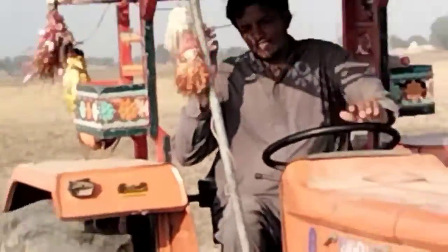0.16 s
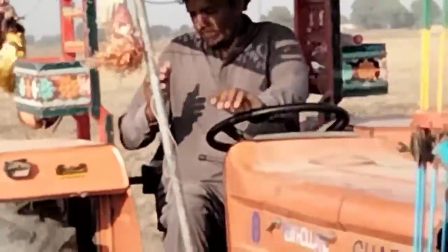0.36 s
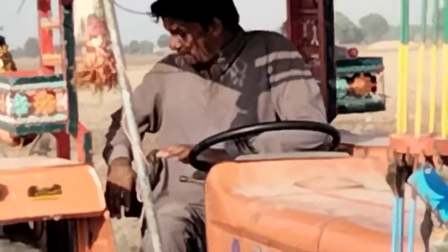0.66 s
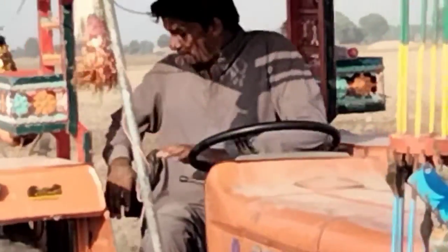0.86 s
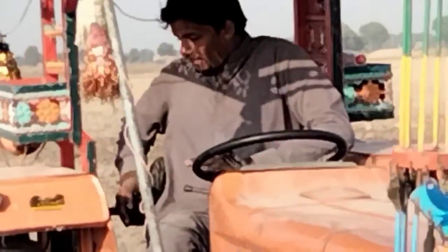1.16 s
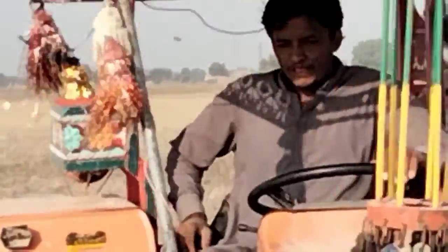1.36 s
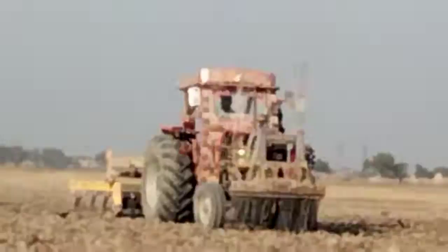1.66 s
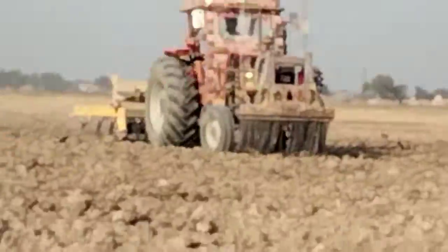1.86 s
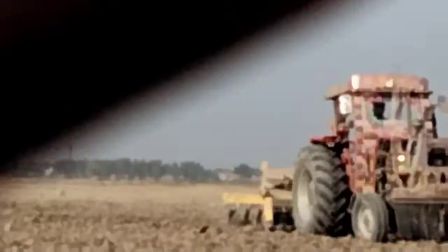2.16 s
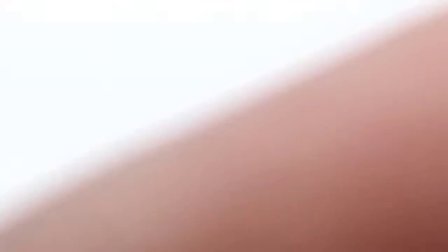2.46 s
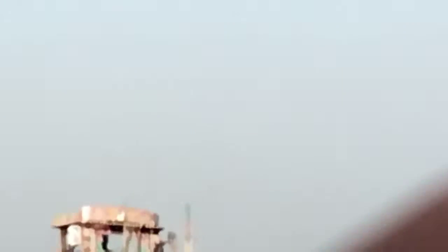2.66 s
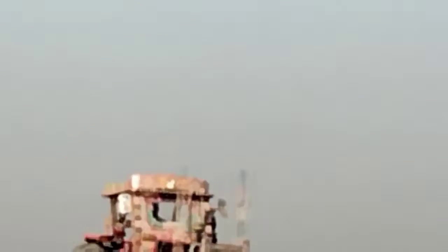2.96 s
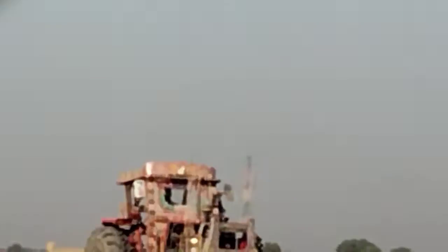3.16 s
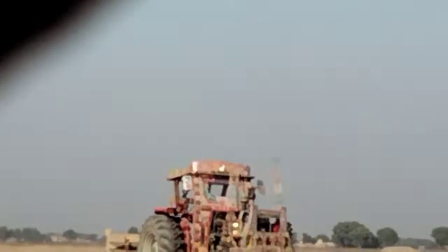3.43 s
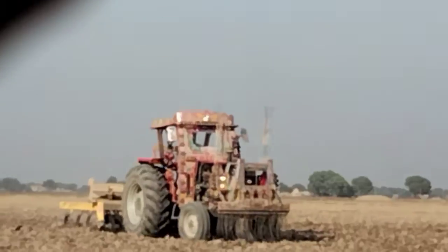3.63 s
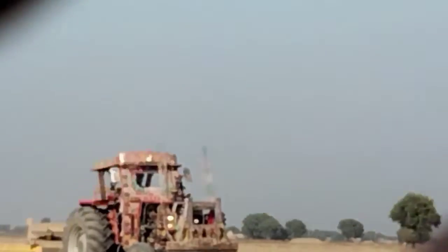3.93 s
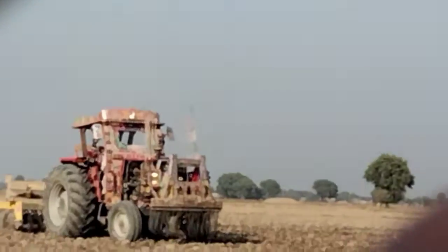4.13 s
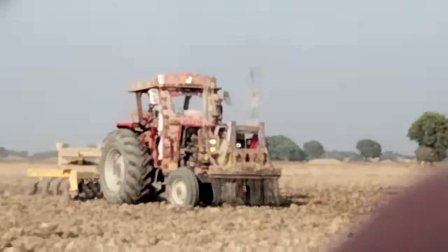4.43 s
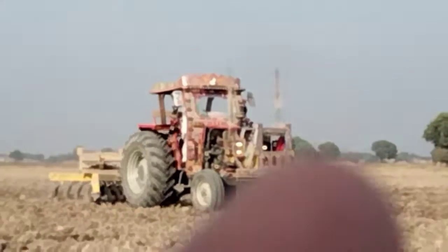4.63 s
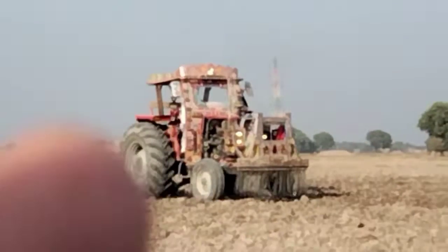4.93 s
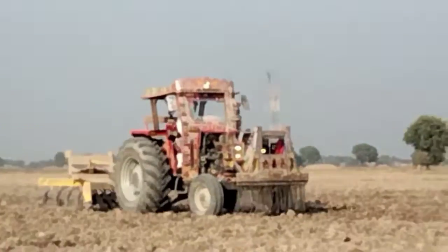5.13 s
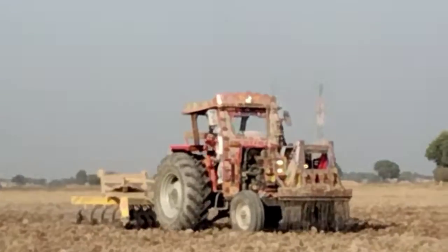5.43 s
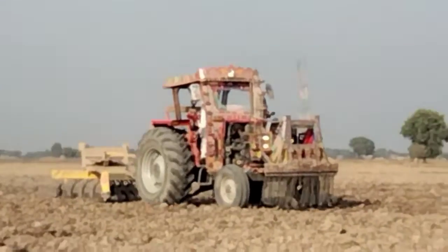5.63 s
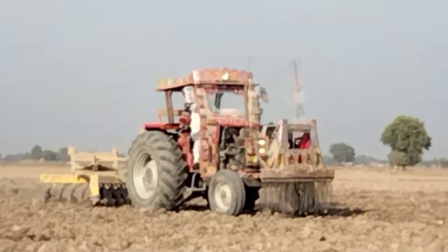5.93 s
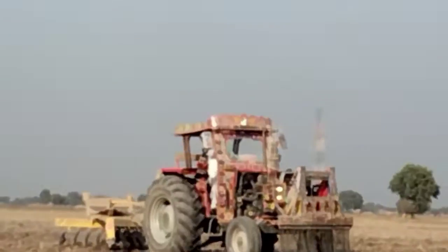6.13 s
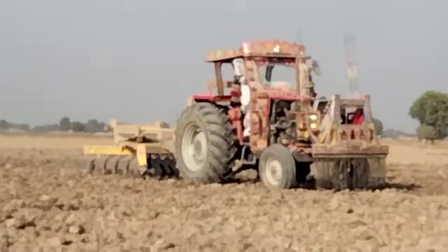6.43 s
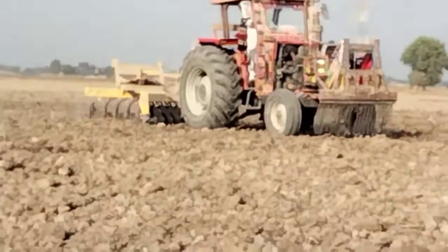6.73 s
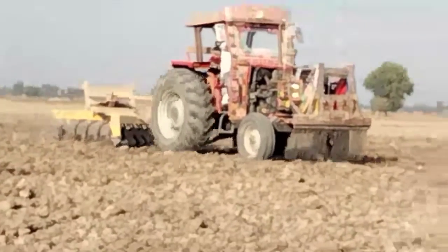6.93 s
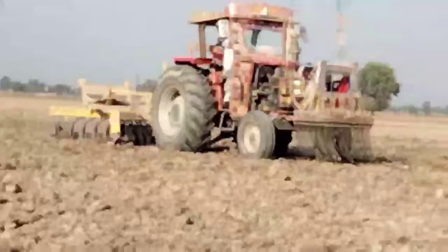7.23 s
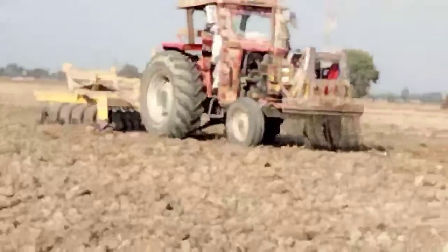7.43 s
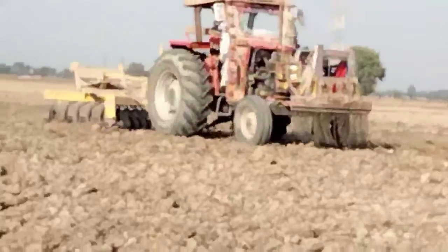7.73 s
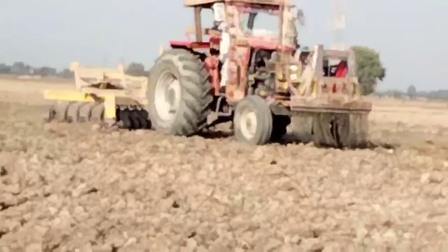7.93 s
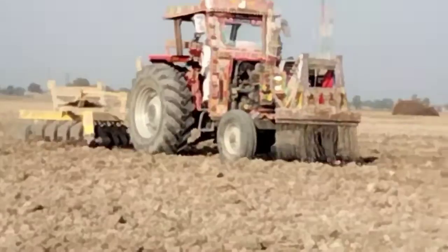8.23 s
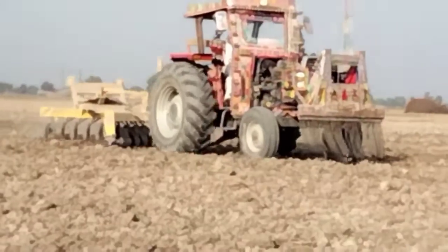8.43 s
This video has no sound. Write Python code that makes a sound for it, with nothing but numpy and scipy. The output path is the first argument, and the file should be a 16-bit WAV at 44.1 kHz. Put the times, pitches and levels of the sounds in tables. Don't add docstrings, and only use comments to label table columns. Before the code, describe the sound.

Outdoors on dry farmland, a phone picks up a three-cylinder diesel tractor very close: fast chugging exhaust, hard piston knocks, loose metal and brief chain shakes, growing louder over a faint second engine. After about two and a half seconds it cuts to two distant tractors, softer, their notes beating over hissing disc harrows, with small bells, stone ticks and gear whine. A hand on the microphone dulls the treble.

```python
import sys
import numpy as np
from scipy import signal
from scipy.fft import rfft, irfft
from scipy.io import wavfile
from scipy.ndimage import uniform_filter1d, map_coordinates

SR = 44100
rng = np.random.default_rng(int(sys.argv[2]) if len(sys.argv) > 2 else 0)


def dump(signal):
    limited = np.clip(np.atleast_2d(signal).T, -1, 1)
    pcm = np.round(limited * 32767).astype(np.int16)
    wavfile.write(sys.argv[1], SR, pcm)


def level_to_linear(level):
    exponent = np.asarray(level, float) / 20
    return 10 ** exponent


N = 378378
T = np.arange(N) / SR
CUT_S = 2.43

# t/s, firing f/Hz
CLOSE_ENGINE = [
    (0.0, 46.4),
    (0.89, 46.92),
    (1.26, 46.15),
    (2.01, 46.84),
    (2.43, 45.33),
]
# t/s, firing f/Hz, level/dB
BEHIND_ENGINE = [(0, 37.7, -51), (.4, 40.4, -40), (.8, 40.4, -44), (1.2, 39.7, -39), (1.6, 41.8, -41),
                 (2.0, 38.4, -36), (2.43, 40, -46)]
# t/s, firing f/Hz
FAR_FOUR = [(2.43, 43.51), (3.21, 45.04), (3.34, 43.6), (3.77, 45.1), (3.94, 46.13), (4.16, 43.57),
            (4.6, 45.51), (5.0, 42.98), (5.49, 45.9), (5.96, 43.15), (6.13, 44.85), (6.78, 43.94),
            (7.13, 43.84), (7.6, 45.18), (7.75, 44.03), (7.89, 44.79), (8.58, 44.21)]
FAR_THREE = [(2.43, 47.41), (3.2, 46.4), (4.09, 48.02), (5.06, 47.22), (5.34, 47.83), (5.86, 47.76),
             (7.23, 45.81), (7.78, 46.01), (8.58, 44.59)]
# multiple of the firing rate, level over the note/dB
CLOSE_ORDERS = [(1, 0.5), (2, 0.5), (3, -0.5), (4, -3.5), (5, -11.5), (6, -5), (7, -51), (8, -34),
                (9, -9.5)]
FOUR_ORDERS = [(1, 4.5), (2, -0.5), (2.999, -21), (1.25, -24), (2.5, -23), (2.75, -21)]
THREE_ORDERS = [(1, -6), (2, -0.5), (3, -28)]
# t/s, level/dB
APPROACH = [
    (0, 0),
    (.86, 1.4),
    (1.46, 4.5),
    (2.0, 4),
    (2.24, 5.5),
    (2.43, 2),
]
# distant level/dB, share of the nearness
CLOSE_LAYERS = [
    (-31, 0.77),
    (-30.5, 0.98),
    (-33.5, 0.49),
    (-40.5, 0.58),
]
# f/Hz, level/dB per Hz
CLOSE_COLOUR = [(35, -7), (60, -7.5), (142, -9), (210, -6), (423, -5.5), (497, -14.5), (792, -7),
                (1830, -14.5), (2360, -15.5), (4030, -20), (5200, -16), (7900, -20), (15500, -55.5)]
# f/Hz,
# width/Hz, level/dB
CLOSE_BODY = [(418, 26, -5.5), (774, 270, 1.5), (1290, 75, 5), (2260, 460, 3), (4000, 67, 1),
              (5130, 2500, 4), (7800, 280, 1.5)]
BONNET = [(10300, 4100, -8), (11940, 900, 7.5)]
CYLINDERS_DB = [2.5, -1, 1.5]
CYLINDERS_LATE = [.02, .08, .08]
# f/Hz, ring time/s, level/dB, hard cylinder extra/dB
BLOCK_MODES = [(900, .025, -11, 2), (1440, 0.025, -5, 1), (2350, 0.014, -6, -8), (2930, 0.0059, -8, 8),
               (3790, 0.018, 0.5, -4), (3160, 0.019, -4, 5.5), (6500, 0.018, -5.5, 2),
               (5095, 0.027, 2.5, 2), (5430, 0.025, -3, 3), (8070, 0.022, -3, 2), (11100, .005, -1.5, 13)]
FAR_MODES = [(1334, 0.045, -5.5, 0), (1433, 0.094, -2, 0), (1582, 0.071, -0.5, 0), (1699, .06, -2.5, -2),
             (2100, 0.052, -4, 2), (2300, 0.05, -4, 1), (2487, 0.1, 0, -2), (2708, 0.075, -2.5, -3),
             (3790, 0.027, -10.5, 2), (5100, 0.018, -14, 0), (6940, .03, -8, 0)]
# t/s, level/dB, f/Hz
SLAPS = [(0.1785, -23, 2370), (0.3087, -17, 2350), (0.3712, -24, 3170), (0.4369, -16, 2320),
         (0.5646, -38, 1960), (0.629, -17, 2110), (0.6928, -17, 2170), (0.757, -16, 2420),
         (0.8425, -16, 2300), (0.8859, -14, 2310), (0.9497, -21, 2350), (1.0141, -22, 2300),
         (1.078, -19, 2300), (1.1428, -22, 2330), (1.2072, -18, 1980), (1.2725, -13, 2420),
         (1.3154, -14, 2200), (1.3372, -9.5, 2370), (1.402, -12, 2070), (1.4446, -21, 2860),
         (1.4666, -17, 2050), (1.5314, -13, 2380), (1.579, -17, 2510), (1.5968, -14, 2460),
         (1.6602, -12, 2020), (1.725, -12, 2160), (1.7464, -21, 2330), (1.8123, -20, 2430),
         (1.8533, -6.5, 2340), (1.8966, -22, 2540), (1.918, -14, 2330), (1.9817, -11, 2320),
         (2.0053, -24, 2290), (2.0455, -18, 2390), (2.1101, -11, 2240), (2.1745, -18, 2200),
         (2.2403, -17, 2260), (2.3052, -10.5, 2180), (2.371, -11.5, 2420), (2.4154, -16, 2260)]
PLATE_SLAPS = [(0.0712, -22, 3820), (0.179, -27, 3700), (0.7567, -25, 3890), (1.3154, -19, 3780),
               (1.4446, -21, 3730), (1.5743, -21, 3830), (1.6606, -23, 3360), (1.725, -26, 3740),
               (1.8327, -27, 3710), (1.94, -24, 3600), (2.175, -19, 3530), (2.2633, -24, 3560),
               (2.3052, -22, 3650), (2.3286, -14, 3650)]
PUMP_SLAPS = [(0.0498, -21, 5020), (0.1136, -22, 5170), (0.2668, -23, 5050), (0.3726, -16, 5000),
              (0.5651, -21, 5200), (0.6938, -18, 5030), (0.7587, -20, 5000), (0.8849, -22, 4970),
              (0.9492, -21, 4980), (1.0585, -21, 4900), (1.0789, -14, 5300), (1.1438, -22, 5200),
              (1.273, -17, 5080), (1.295, -19, 5110), (1.3174, -21, 5230), (1.3379, -22, 5150),
              (1.4022, -17, 5700), (1.6856, -17, 5270), (1.7684, -16, 5100), (1.7903, -20, 5000),
              (1.918, -22, 5210), (2.1106, -20, 5270)]
# t/s, length/s, level/dB, ringing link f/Hz, ring share
CHAIN = [
    (1.569, 0.045, -22, 6000, 0.73),
    (1.833, 0.029, -29, 5900, .6),
    (2.007, 0.061, -21.5, 5870, 0.61),
    (2.2, 0.074, -22.5, 7600, 0.33),
    (2.28, 0.16, -25.5, 7340, 0.37),
]
# from t/s, to t/s, f/Hz, width/Hz, level/dB
CLOSE_HOLLOWS = [(-.2, .5, 920, 199, 4), (-.2, .7, 2750, 300, -1), (-.2, 1.3, 4260, 400, -0.5),
                 (.4, 1.3, 820, 200, 2), (2.0, 2.6, 7440, 1500, 0.5), (2.0, 2.6, 11200, 2000, -1),
                 (2.0, 2.6, 2500, 800, 2), (1.1, 1.4, 400, 119, -4.5)]
FAR_HOLLOWS = [(2.202, 2.9, 5070, 900, 4.5), (2.202, 2.9, 6240, 500, -3), (2.2, 2.9, 8050, 2000, 2.5),
               (2.2, 2.9, 13500, 3000, -3), (2.2, 2.9, 2500, 300, 0), (2.2, 2.9, 2100, 300, -3.5),
               (4.102, 4.7, 2870, 350, 3), (7.24, 7.358, 2350, 500, 4), (7.6, 7.7, 2400, 500, 4),
               (5.2, 6.402, 4130, 600, 3.5), (5.8, 6.6, 3470, 300, -3), (5.2, 5.8, 4580, 300, -5),
               (5.8, 6.4, 7260, 600, 5.5), (5.8, 6.4, 1330, 200, 3), (5.8, 6.5, 10450, 400, 0),
               (4.7, 5.803, 14000, 2000, 4.5), (6.5, 7.3, 9800, 500, -4), (6.9, 7.3, 6500, 700, -2),
               (6.9, 7.3, 5600, 400, 1), (7.2, 7.75, 2350, 400, 0), (7.3, 7.7, 7800, 600, 0),
               (7.75, 8.8, 5000, 250, -9), (7.75, 8.8, 7400, 300, -6), (7.7, 8.8, 9950, 300, 1)]
# t/s, level/dB, cover 0-1
FIELD = [(2.44, -41, 0.04), (2.82, -41, 0.3), (2.95, -37.5, 0.21), (3.26, -35.5, 0.28), (3.6, -36, 0.62),
         (3.9, -39, 1.1), (4.3, -39, 0.94), (4.66, -36.5, 0.63), (4.72, -35, 0.42), (5.04, -35, 0.17),
         (5.43, -35.5, 0.2), (6.0, -39.5, .01), (6.3, -38.5, 0.04), (6.5, -40, 0.05), (6.89, -40.5, 0.02),
         (7.3, -39.5, 0.13), (7.62, -39, 0.12), (8.58, -38.5, 0.12)]
# f/Hz, level/dB per Hz
OPEN_COLOUR = [(290, -58), (500, -14), (726, -7), (803, -8), (927, -9.5), (1060, -8.5), (1620, 1),
               (2760, -1.5), (3190, -7), (5510, -17), (7030, -16.5), (11500, -17), (15500, -15.5)]
CUPPED_COLOUR = [(290, -38), (500, -19), (769, -8.5), (839, -7), (1090, -13), (1390, -6.5), (1960, -5.5),
                 (2460, -9.5), (6180, -18), (8360, -18), (15500, -24)]
SHADED_COLOUR = [(290, -51), (500, -17.5), (888, -9), (997, -15), (1370, -7), (1850, -6.5), (2010, -1.5),
                 (2500, -4.5), (3190, -13.5), (8360, -19.5), (15500, -29.5)]
# f/Hz, width/Hz, level/dB
OPEN_BODY = [(829, 68, 7.5), (1244, 270, 4.5), (2480, 140, 3), (1050, 71, 5.5), (4450, 1000, 1.5)]
CUPPED_BODY = [(1340, 110, 9), (1850, 260, -4.5), (2460, 250, 9), (6460, 640, 0), (9100, 500, 4),
               (10700, 360, 7), (11600, 1500, -9)]
SHADED_BODY = [(1366, 88, 8.5), (1850, 180, -7), (2300, 430, 2), (5560, 300, 1.5), (6250, 270, 3),
               (7340, 630, -3), (9400, 300, 4), (10000, 310, -3), (10450, 450, 2.5), (8340, 500, 4.5),
               (12000, 1300, -10), (14300, 900, 10)]
# level under it/dB, loss to full cover/dB, loss to cupping/dB, delay of the hand/s
PORT = [
    (-9.5, -3, -7, .01),
    (-9.5, -7.5, -4.5, .01),
    (-29, -31, -4, .17),
    (-14.5, -38, -3, 0.55),
]
# f/Hz, level/dB per Hz
SOIL = [(18, 0), (40, 3), (110, 3.5), (150, -1.5), (220, -11.5), (350, -5), (480, -11.5), (620, -7.5),
        (800, -42.5)]
# t/s, f/Hz
GEAR = [(5.0, 773.2), (5.22, 836.2), (5.32, 811.8), (5.6, 866.6), (5.97, 829.8), (6.03, 852.7),
        (8.29, 854.1), (8.3, 826.8), (8.58, 861.6)]
# multiple of the mesh, level/dB
GEAR_LINES = [(1, -7), (.815, -14), (.455, -16)]
# t/s, f/Hz, level/dB, length/s
BELLS = [(4.87, 14350, -62, .025), (4.953, 13200, -56, .025), (4.955, 12400, -58, .03),
         (4.955, 15300, -58, .03), (4.997, 12630, -51, .07), (4.997, 15340, -51, .06),
         (4.997, 14770, -59, .07), (4.997, 10510, -53, 0.087), (5.01, 9490, -57, .05),
         (5.3, 13000, -62, .03), (5.35, 9500, -50, .06), (5.358, 10300, -47, .05), (5.587, 14900, -54, .04),
         (5.8, 9500, -61, .025), (5.95, 12050, -57, .02), (6.27, 14900, -57, 0.037),
         (6.27, 12300, -58, .025), (6.42, 8650, -51, 0.049), (6.56, 8750, -48, 0.026),
         (7.31, 8650, -53, .03), (7.412, 7800, -48, .015), (6.02, 14700, -62, .04),
         (7.22, 8250, -44, 0.029), (7.435, 11800, -64, .035), (7.222, 10400, -58, .03),
         (7.228, 12800, -66, .02), (7.23, 14900, -64, .02), (7.256, 7600, -52, .015),
         (7.395, 9500, -58, .03), (5.967, 8080, -43, .015)]
# t/s, f/Hz, level/dB
GROAN = [
    (2.65, 386, -65),
    (2.69, 377, -52),
    (2.74, 356, -59),
    (2.77, 408, -53),
    (2.84, 350, -52),
    (2.91, 319, -68),
]
# t/s, level/dB, f/Hz, length/s
TAPS = [
    (4.25, -48, 25, .04),
    (8.155, -42, 190, .004),
    (8.4298, -29, 130, .0022),
]
# t/s, level/dB, length/s
RUBS = [
    (4.23, -60, .006),
    (4.36, -60, .006),
    (6.85, -51, .006),
    (7.228, -55, .012),
    (7.827, -43, .004),
]
# t/s, level/dB, f/Hz
STONES = [(2.7104, -34, 2680), (2.8989, -34, 2660), (2.9229, -28, 1930), (3.8792, -24, 2700),
          (4.2174, -30, 2650), (4.867, -27, 2130), (5.3314, -27, 1940), (5.7689, -27, 2380),
          (5.8343, -29, 2310), (6.5751, -32, 2510), (6.6404, -32, 2460), (6.811, -33, 2460),
          (6.9168, -35, 2680), (7.2416, -33, 2260), (7.5923, -22, 2430), (7.6651, -20, 2430),
          (7.7554, -27, 2520)]

CUP_S, SHADE_S = 6.42, 7.2


def curves(table):
    s, *columns = np.transpose(table)
    return [np.interp(T, s, c) for c in columns]


def fade(s, length):
    return np.clip((T - s) / length + .5, 0, 1)


def unit(x):
    return x / np.sqrt(np.mean(x ** 2))


def walk(rate):
    k = int(SR / rate)
    steps = np.repeat(rng.standard_normal(N // k + 1), k)
    return uniform_filter1d(uniform_filter1d(steps, k), k)[:N]


def bandpass(x, order, low_hz, high_hz):
    return signal.sosfilt(signal.butter(order, [low_hz, high_hz], "bandpass", fs=SR, output="sos"), x)


def colour(x, points, body=()):
    f = np.fft.rfftfreq(4096, 1 / SR) + 1
    hz, level_db = np.array(points).T
    db = np.interp(np.log(f), np.log(hz), level_db)
    db = db + sum(g / (1 + (2 * (f - centre) / w) ** 2) for centre, w, g in body)
    ceps = irfft(db * np.log(10) / 20)
    ceps[1:2048] *= 2
    ceps[2049:] = 0
    return signal.oaconvolve(x, irfft(np.exp(rfft(ceps))))[:N]


def bands(x, edges_hz, levels_db):
    spectrum, f = rfft(x), np.fft.rfftfreq(N, 1 / SR) + 1
    below = [0] + [1 / (1 + (f / hz) ** 10) for hz in edges_hz] + [1]
    parts = (irfft(spectrum * (hi - lo), N) for lo, hi in zip(below, below[1:]))
    return sum(unit(p) * level_to_linear(db) for p, db in zip(parts, levels_db))


def hollows(x, table):
    out = x.copy()
    for start, end, hz, width, db in table:
        span = slice(max(int((start - .2) * SR), 0), int((end + .2) * SR))
        inside = np.minimum(T[span] - start, end - T[span])
        facing = np.clip(inside / 0.21 + .5, 0, 1)
        peak = signal.lfilter(*signal.iirpeak(hz, hz / width, SR), out[span])
        out[span] += facing * (level_to_linear(db) - 1) * peak
    return out


def turns(hz, start_s, turn):
    return turn + np.cumsum(hz * (T >= start_s)) / SR


def exhaust(turn, orders, lag, wobble_db):
    out = 0
    for k, db in orders:
        level = np.sqrt(2) * level_to_linear(db + wobble_db * walk(11.0))
        out = out + level * np.cos(k * 2 * np.pi * turn - lag * (k - 1))
    return out


def block(fired, modes, scatter_db):
    cycle = np.maximum(fired, 0).astype(int)
    at = np.flatnonzero(np.diff(cycle)) + 1
    hard = cycle[at] % len(CYLINDERS_DB) == 0
    out = 0
    for hz, t60, db, hard_db in modes:
        late, luck, sign = rng.standard_normal((3, len(at)))
        struck = np.clip(at + (50 * np.abs(late)).astype(int), 0, N - 1)
        kicks = np.zeros(N)
        kicks[struck] = level_to_linear(hard_db * hard + scatter_db * luck) * np.sign(sign)
        spin = np.exp(2j * np.pi * hz / SR)
        dies = spin * np.exp(-np.log(1000) / (t60 * SR))
        builds = spin * np.exp(-1 / (0.00046 * SR))
        out = out + level_to_linear(db) * unit(signal.lfilter([1], np.poly((dies, builds)), kicks).imag)
    return out


def clinks(count, cycles, scatter_db, low_hz=2500):
    at, pitch, loud = rng.random((count, 3)).T
    hz, age = low_hz + (15000 - low_hz) * pitch[:, None], np.arange(800) / SR
    length = np.minimum(cycles / hz ** .5, 800 / SR)
    envelope = np.sin(np.pi * np.minimum(age / length, 1) ** 0.32) ** 2
    rings = envelope * np.sin(2 * np.pi * hz * age) * level_to_linear(scatter_db * loud)[:, None]
    place = (at * (N - 800)).astype(int)[:, None] + np.arange(800)
    return unit(np.bincount(place.ravel(), rings.ravel(), N))


def slaps(table, rise, decay, gain_db, crack):
    out, noise = np.zeros(N), rng.standard_normal(N)
    for s, db, hz in table:
        span = slice(int(s * SR), int(s * SR) + SR // 20)
        age = T[span] - s
        envelope = np.clip(age / rise, 0, 1) ** 2 * np.exp(-np.maximum(age - rise, 0) / decay)
        body = np.sin(2 * np.pi * hz * age) + crack * uniform_filter1d(noise[span], size=3)
        out[span] += level_to_linear(db + gain_db) * envelope * body
    return out


def soil():
    level_db = -51 + 1.1 * np.maximum(T - 6.2, 0) + 0.65 * walk(10)
    return unit(colour(rng.standard_normal(N), SOIL)) * level_to_linear(level_db)


def engine_behind():
    hz, note_db = curves(BEHIND_ENGINE)
    return exhaust(turns(hz, 0, 0.16), [(1, -3), (2, -14)], 1.4, .8) * level_to_linear(note_db)


def fingers():
    rub = bandpass(rng.standard_normal(N), 2, 7000, 14500)
    out = sum(level_to_linear(db) * np.exp(-((T - s) / length) ** 2) * rub for s, db, length in RUBS)
    for s, db, hz, length in TAPS:
        out += level_to_linear(db) * np.exp(-((T - s) / length) ** 2) * np.cos(2 * np.pi * hz * (T - s))
    return out


def frame_groan():
    hz, db = curves(GROAN)
    tone = np.sqrt(2) * np.sin(2 * np.pi * np.cumsum(hz) / SR)
    return level_to_linear(db) * (T < GROAN[-1][0]) * tone


def bells():
    out, swing = np.zeros(N), level_to_linear(3.0 * walk(120))
    for s, hz, db, length in BELLS:
        span = slice(int(s * SR), int(s * SR) + SR // 5)
        age = T[span] - s
        envelope = np.clip(age / 0.0018, 0, 1) * np.exp(-(age / length) ** 3)
        out[span] += np.sqrt(2) * level_to_linear(db) * swing[span] * envelope * np.sin(2 * np.pi * hz * age)
    return out


def palm(x, cup):
    notch_hz = 6000 + 1200 * fade(6.8, .45)
    treble = signal.sosfiltfilt(signal.butter(2, 4000, "highpass", fs=SR, output="sos"), x)
    echo = map_coordinates(treble, [np.arange(N) - SR / notch_hz], mode="mirror")
    return x - 0.55 * cup * echo


def far_notes(four, three):
    four_db = -43 + 0.34 * (T - CUT_S) + 0.5 * fade(8.9, 0.27)
    notes = exhaust(four, FOUR_ORDERS, 3.35, 1.0) * level_to_linear(four_db)
    return notes + exhaust(three - .318, THREE_ORDERS, 2.28, 0.6) * level_to_linear(-46)


def whines(three, cup):
    mesh = turns(curves(GEAR)[0], CUT_S, 0) + 0.25 * walk(25)
    gears = exhaust(mesh, GEAR_LINES, 0, 2.5) * level_to_linear(-64 + 12.5 * fade(5.5, 1.2))
    bearing = exhaust(1430 * T + 0.13 * walk(25), [(0.97, -53)], 0, 4.3)
    bearing = bearing * (fade(2.9, .2) - fade(4.5, .4))
    pump = exhaust(three + 0.011 * walk(14), [(22.8, -63)], 0, 5.1)
    return gears + bearing + (1 - cup) * pump


def harrow_clatter(four, three, cup, shade):
    uneven = level_to_linear(1.8 * np.clip(rng.standard_normal((400, 2)), -1.5, 1.5))
    four_fired, three_fired = four - .25, three - .2
    throb = 0.8 * uneven[four_fired.astype(int), 0] * np.exp(-(four_fired % 1) / 0.15)
    throb += .5 * uneven[three_fired.astype(int), 1] * np.exp(-(three_fired % 1) / 0.57)
    noise = rng.standard_normal(N) * (level_to_linear(0.51 * walk(12)) + uniform_filter1d(throb, size=80))
    noise = unit(noise) + level_to_linear(-13) * clinks(count=3000, cycles=0.81, scatter_db=9.5)
    noise += level_to_linear(-13) * clinks(count=500, cycles=1.9, scatter_db=10, low_hz=6870)

    hiss = (1 - cup) * unit(colour(noise, OPEN_COLOUR, OPEN_BODY))
    hiss += (cup - shade) * unit(colour(noise, CUPPED_COLOUR, CUPPED_BODY))
    hiss += shade * unit(colour(noise, SHADED_COLOUR, SHADED_BODY))
    hiss += level_to_linear(-12.5) * unit(block(four_fired, FAR_MODES, 5.2))
    hiss = palm(hiss, fade(CUP_S + 0.19, .15) - 0.44 * shade)

    clatter_db, cover = curves(FIELD)
    levels_db = [clatter_db]
    for db, cover_db, cup_db, late in PORT:
        levels_db.append(clatter_db + db + cover_db * cover + cup_db * fade(CUP_S + late, 0.43))
    ring_hz = (1 - cup) * 7200 + (cup - shade) * 8300 + shade * 7860
    lowpass = signal.butter(2, 550, fs=SR, output="sos")
    spread = unit(signal.sosfilt(lowpass, noise * (0.12 + throb)))
    ring = np.sin(2 * np.pi * np.cumsum(ring_hz) / SR) * spread
    clatter = bands(hiss, (3410, 6000, 10000, 13200), levels_db) + ring * level_to_linear(levels_db[2] - 4.0)
    return hollows(clatter, FAR_HOLLOWS)


def far_tractors():
    four = turns(curves(FAR_FOUR)[0], CUT_S, .793)
    three = turns(curves(FAR_THREE)[0], CUT_S, .222)
    cup, shade = fade(CUP_S, .3), fade(SHADE_S, .35)
    return far_notes(four, three) + whines(three, cup) + harrow_clatter(four, three, cup, shade)


def chains():
    spray = bandpass(rng.standard_normal(N), 3, 5000, 10000)
    flutter, out = level_to_linear(3.8 * walk(150)), np.zeros(N)
    for s, length, db, hz, ring in CHAIN:
        span = slice(int(s * SR), int(s * SR) + SR // 5)
        age = T[span] - s
        envelope = np.clip(age / 0.0066, 0, 1) * np.exp(-(age / length) ** 3)
        link = np.exp(-age / 0.11) * np.sin(2 * np.pi * hz * age * (1 + 0.4 * age))
        out[span] += level_to_linear(db) * envelope * flutter[span] * (spray[span] + ring * link)
    return out


def hard_slaps():
    out = slaps(SLAPS, 0.0013, 0.0041, -6.5, 0.48)
    out += slaps(PLATE_SLAPS, 0.0015, 0.0032, -2.5, .1)
    return out + slaps(PUMP_SLAPS, 0.0011, 0.0036, -4.5, .1)


def close_tractor():
    hz, near_db = curves(CLOSE_ENGINE)[0], curves(APPROACH)[0]
    bark_db, *rest_db = (db + share * near_db for db, share in CLOSE_LAYERS)
    turn = turns(hz, 0, .877)
    low = exhaust(turn, CLOSE_ORDERS[:2], 2.16, 0.74) * level_to_linear(-33.5 - 3 * fade(2.26, 0.22))

    fired = turn - .13
    fired = fired - np.take(CYLINDERS_LATE, (fired + .5).astype(int) % len(CYLINDERS_LATE))
    cycle = np.maximum(fired, 0).astype(int)
    blow_db = np.take(CYLINDERS_DB, cycle % len(CYLINDERS_DB))
    blow = level_to_linear(blow_db + 1.2 * rng.standard_normal(500)[cycle])

    bark_lag = 1.72
    bark = exhaust(turn, CLOSE_ORDERS[3:], bark_lag, 2.3) * level_to_linear(bark_db - 6.0)
    bark *= uniform_filter1d(blow, size=400) ** 0.1
    stack_db = -28 - 6 * np.abs(T - 2.05)
    bark += exhaust(turn, CLOSE_ORDERS[2:3], bark_lag, 0.47) * level_to_linear(stack_db)

    knock = 1.57 * blow * np.exp(-((fired - .04) % 1) / .21)
    valves = 0.5 * np.exp(-((fired + 0.56) % 1) / 0.13)
    pulses = uniform_filter1d(knock + valves, size=140)
    noise = unit(rng.standard_normal(N) * (level_to_linear(1.05 * walk(19.7)) + pulses))
    loose = clinks(count=3000, cycles=0.91, scatter_db=6)
    noise += level_to_linear(-5.5) * loose * uniform_filter1d(0.08 + knock, size=200)

    level = fade(1.42, 0.27)
    clatter = (1.5 - level) * colour(noise, CLOSE_COLOUR, CLOSE_BODY + BONNET)
    clatter += level * colour(noise, CLOSE_COLOUR, CLOSE_BODY)
    clatter += colour(block(fired, BLOCK_MODES, 2.1), CLOSE_COLOUR) * level_to_linear(-13.0)
    clatter = bands(clatter, (600, 3300, 9000), [bark_db - 4.0, *rest_db])
    return low + bark + hollows(clatter, CLOSE_HOLLOWS)


def scene():
    far = fade(CUT_S, 1 / 500)
    close = engine_behind() + chains() + hard_slaps() + close_tractor()
    stones = slaps(STONES, .002, 0.0051, -7, .1)
    field = soil() + fingers() + frame_groan() + bells() + stones + far_tractors()
    return ((1 - far) * close + far * field)[None]


def top_cut(x):
    return signal.sosfilt(signal.butter(12, 15690, fs=SR, output="sos"), x)


def record(dry):
    mix = signal.sosfilt(signal.ellip(10, .3, 60, 15480, fs=SR, output="sos"), dry)
    return top_cut(mix)


dry = scene()
out = record(dry)
dump(out)
```